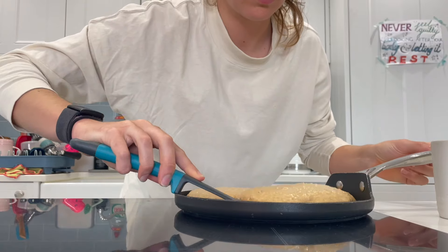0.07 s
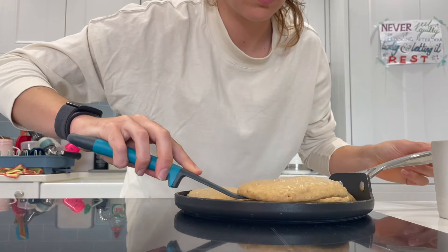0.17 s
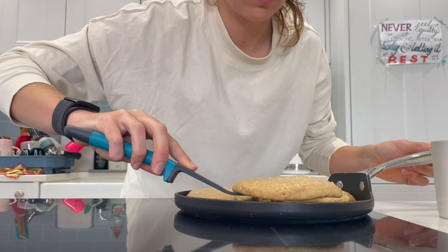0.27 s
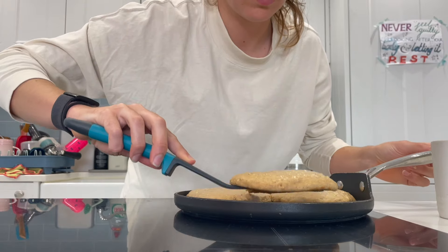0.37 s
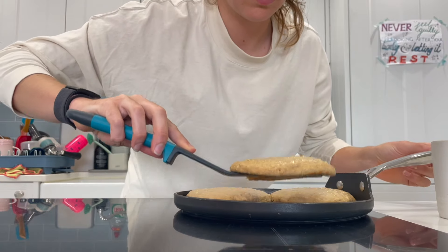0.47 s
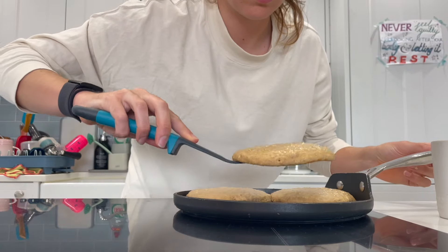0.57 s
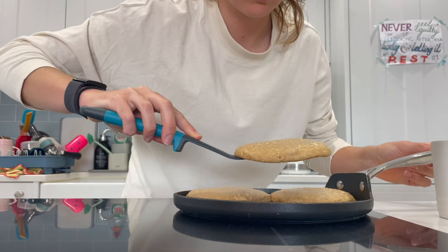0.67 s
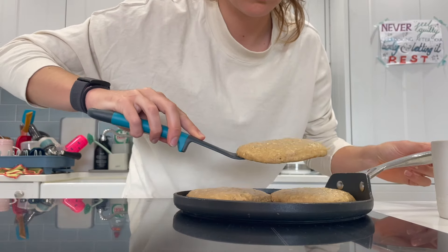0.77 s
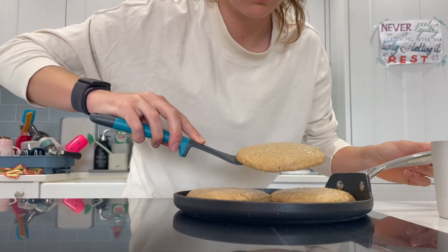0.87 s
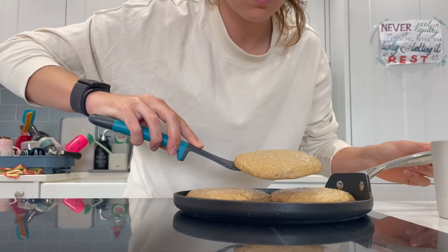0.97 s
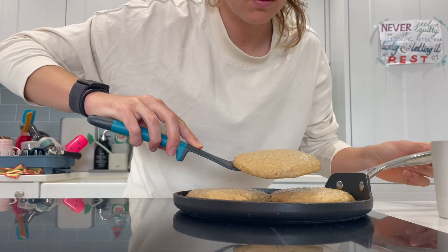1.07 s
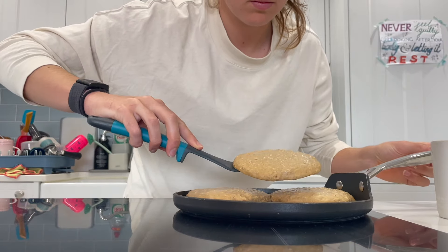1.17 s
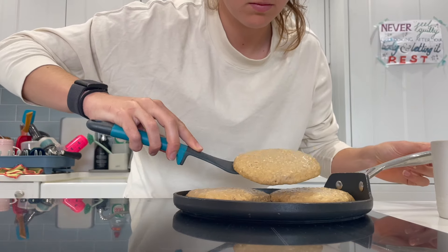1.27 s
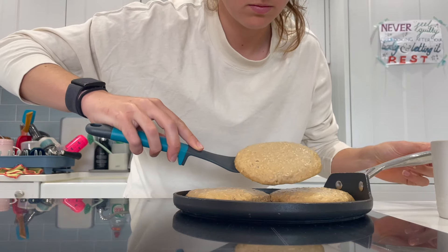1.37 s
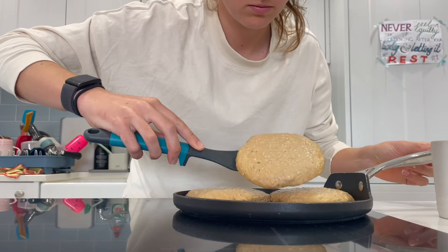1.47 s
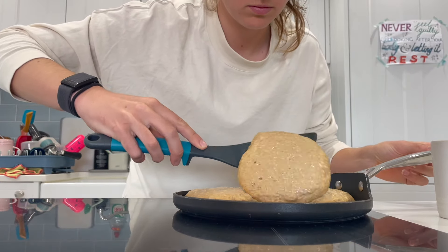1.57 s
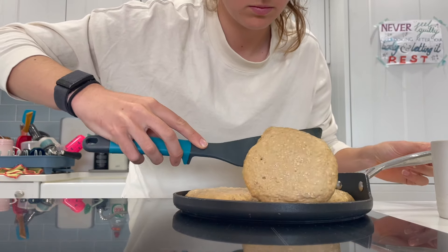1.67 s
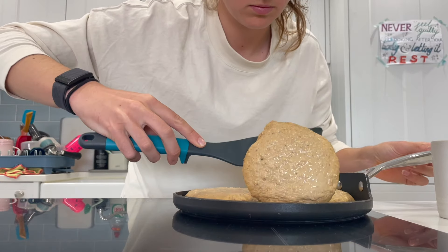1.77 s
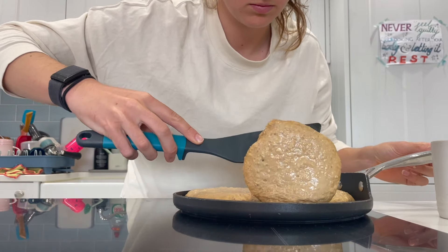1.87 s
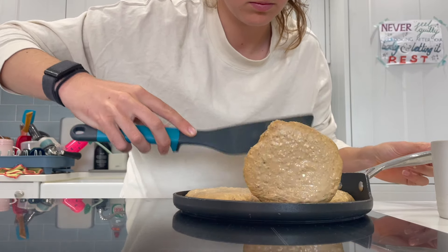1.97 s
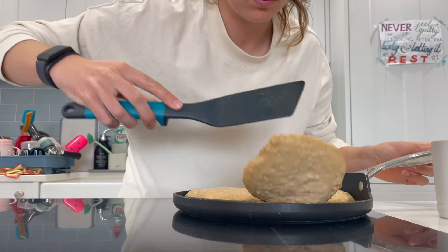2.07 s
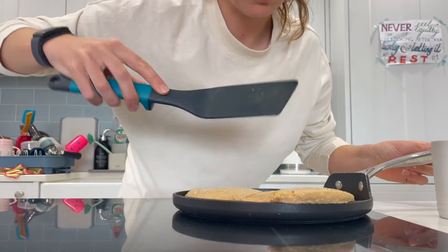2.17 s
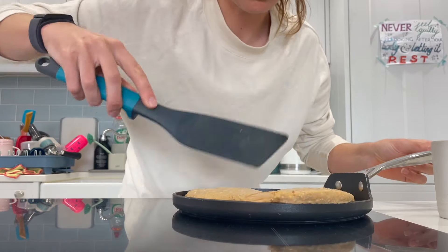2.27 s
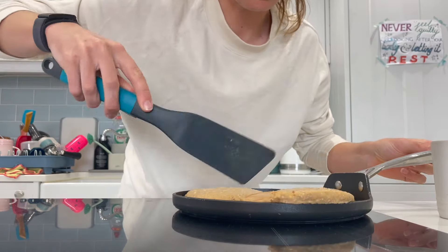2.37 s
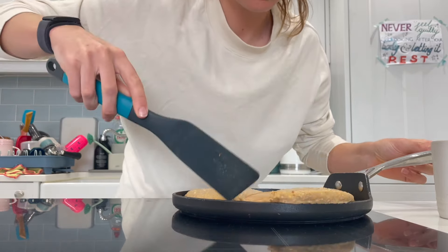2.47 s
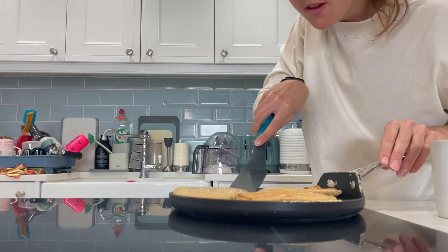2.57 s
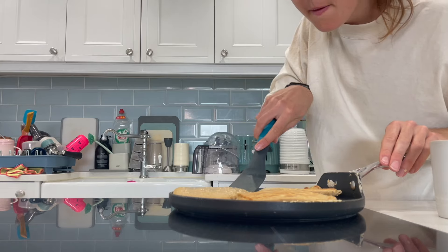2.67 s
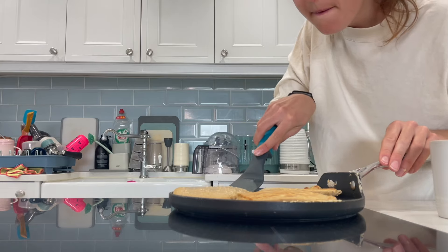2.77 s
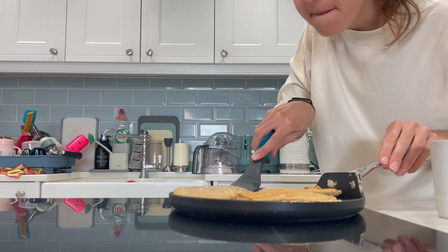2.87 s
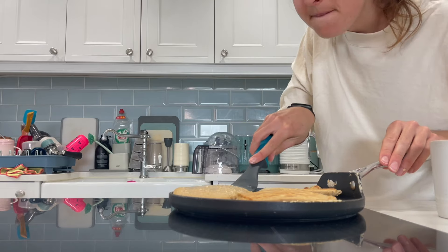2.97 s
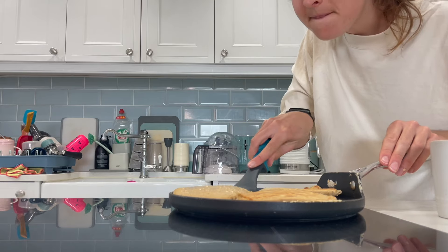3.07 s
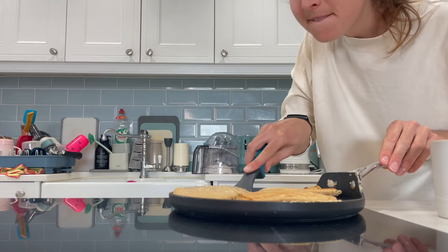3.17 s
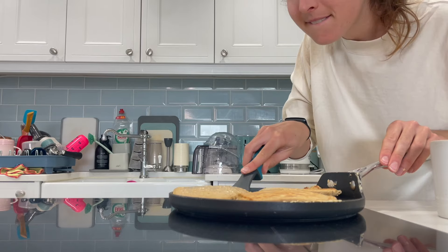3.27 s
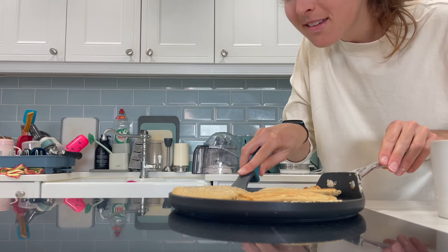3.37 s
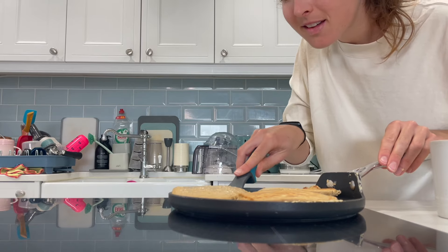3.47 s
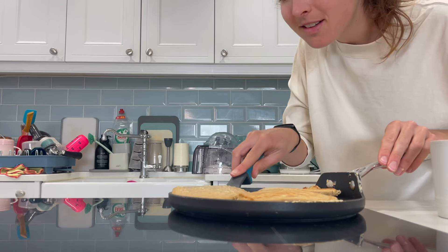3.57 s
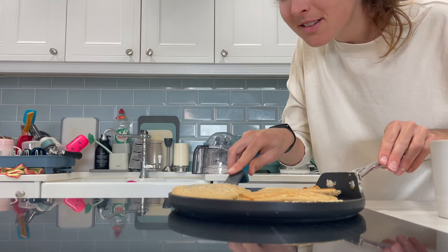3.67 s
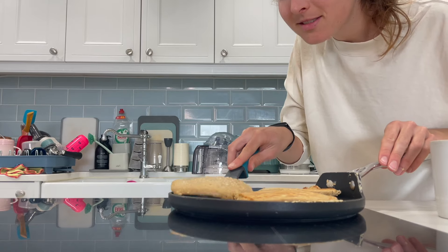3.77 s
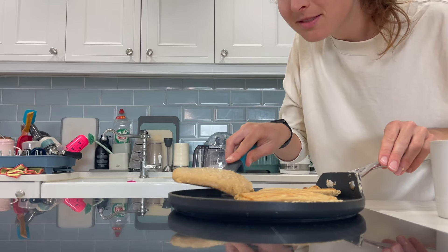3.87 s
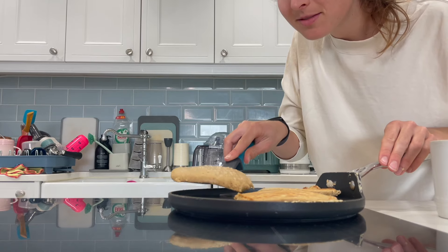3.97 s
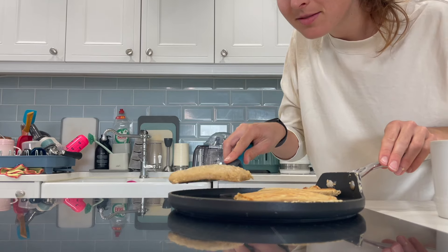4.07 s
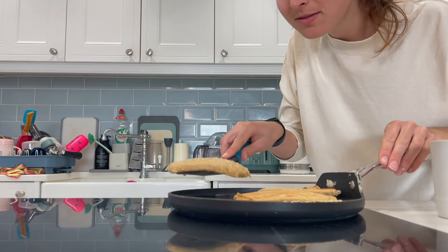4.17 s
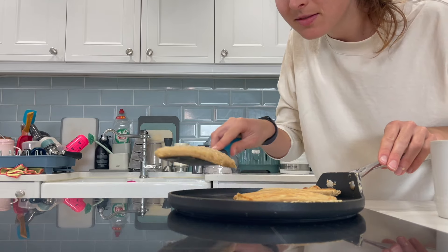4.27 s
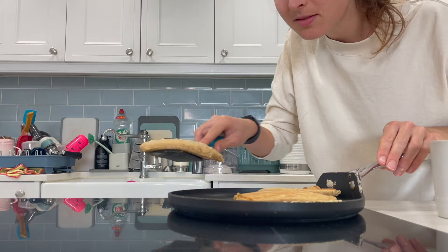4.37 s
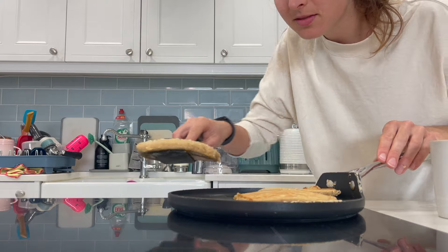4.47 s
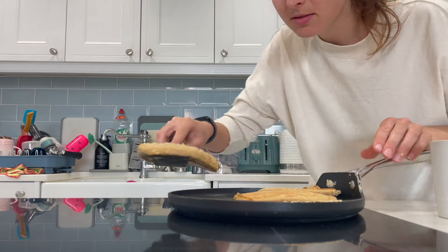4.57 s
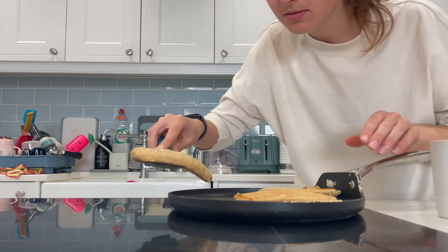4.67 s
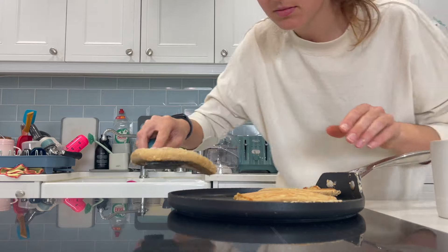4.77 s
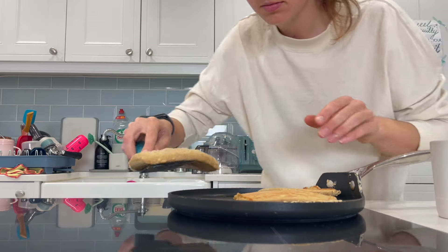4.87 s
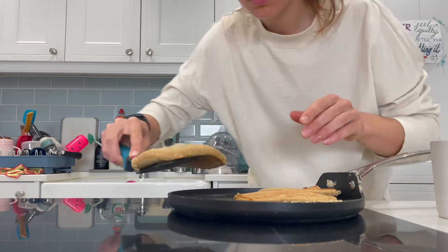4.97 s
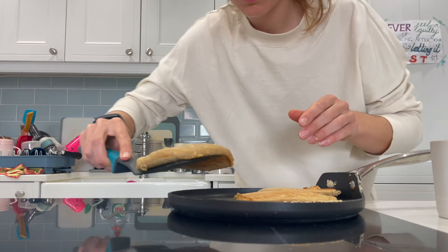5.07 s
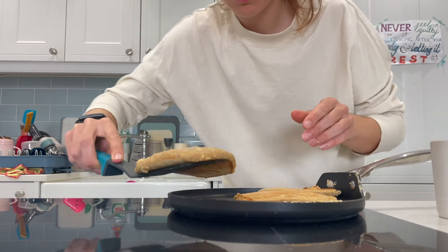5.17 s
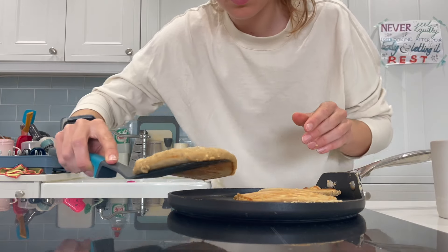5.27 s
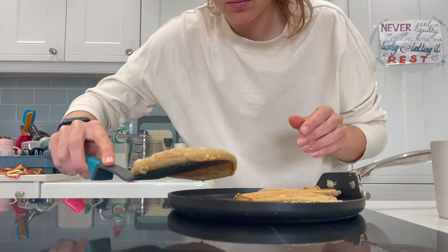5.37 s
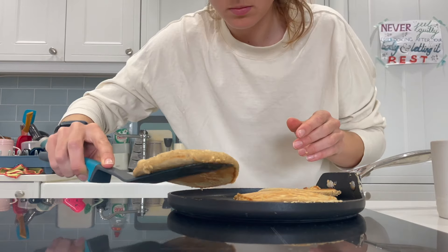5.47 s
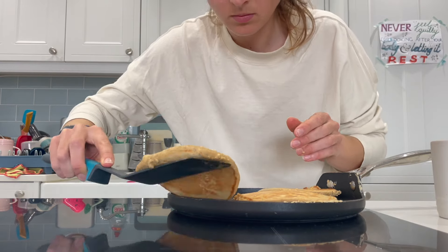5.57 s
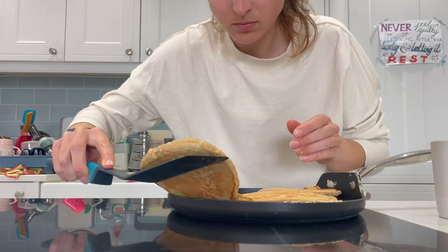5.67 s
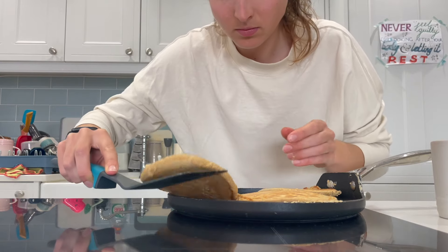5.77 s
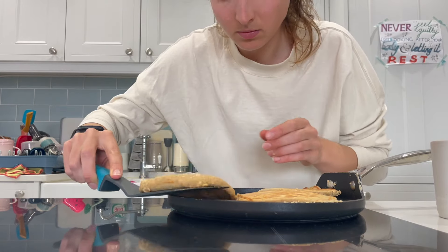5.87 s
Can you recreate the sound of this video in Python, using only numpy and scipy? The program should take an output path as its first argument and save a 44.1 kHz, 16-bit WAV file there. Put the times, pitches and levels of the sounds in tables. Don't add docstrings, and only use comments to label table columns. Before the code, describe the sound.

In a small home kitchen, a low fan hum runs throughout. After a quiet start, a plastic spatula slides in a coated pan with brief wet sizzle, then a pancake slaps down heavily and the blade knocks the pan hard. A cut follows, then long gritty scrapes ending in knocks, tiny fat spits, a heavier bump, and short squeaky scrapes with thuds. Close stereo phone microphone on the counter.

```python
import sys
import numpy as np
from scipy import signal
from scipy.fft import rfft, irfft
from scipy.io import wavfile

SR = 44100
rng = np.random.default_rng(int(sys.argv[2]) if len(sys.argv) > 2 else 0)


def rack_gain(trim_db):
    fader = np.asarray(trim_db, float)
    return 10 ** (fader / 20)


def dump(signal):
    limited = np.clip(np.atleast_2d(signal).T, -1, 1)
    pcm = np.round(limited * 32767).astype(np.int16)
    wavfile.write(sys.argv[1], SR, pcm)


N = 260631
T = np.arange(N) / SR
HZ = np.maximum(np.arange(N // 2 + 1) * SR / N, 1)
SCENE_CHANGE_S = 2.573

# f/Hz, density/dB per Hz
AIR_COLOUR = [(25, -16), (45, -1), (70, 0), (150, 0), (250, -5.5), (450, -12.5), (600, -25), (1100, -28.5),
              (1800, -39), (3100, -29.5), (4200, -33.5), (8000, -25), (11500, -32), (15500, -30)]
# f/Hz, peak level/dB
HUM_TONES = [(93.3, -53), (99.8, -56)]
# f/Hz, rms level/dB
WHINE_TONES = [(236.9, -71.5), (1050, -83), (1120, -82.5), (2696, -90), (2896, -85), (2994, -84),
               (3193, -87), (3493, -82.5), (3592, -80.5)]
HUMS_IN_STEP_S = (.7705, 4.371)
# f/Hz, density/dB per Hz
GRIT_COLOUR = [(500, -10.5), (800, 1.5), (1100, 3), (1800, -4.5), (2600, -3.5), (3400, -10), (4500, -28.5)]
EDGE_COLOUR = [(2500, -26), (3800, 0), (6000, -6), (8500, -1.5), (11500, -13.5), (15600, -30.5)]
BODY_COLOUR = [(100, 1.5), (160, 1.5), (250, -1), (450, -3.5), (700, -3.5), (1000, -33.5)]
# f/Hz, width/Hz, lift/dB
PAN_PEAKS = [(422, 51, 6), (588, 70, 4.5), (700, 75, 1), (960, 110, 1.5), (1350, 100, 1.5), (1670, 220, 6),
             (2400, 110, 2), (3027, 35, 3), (3200, 280, 5), (4460, 140, -2), (5610, 300, 6)]
# start t/s, end t/s, start friction/dB, end friction/dB, load/dB
SLIDES = [(1.45, 1.5, -48, -42.5, 0), (1.505, 1.533, -40.5, -41.5, -2), (1.586, 1.764, -56, -61.5, 7),
          (1.77, 2.047, -65.5, -67, 5), (2.14, 2.31, -56.5, -80, 20), (2.574, 3.064, -53.5, -49, -1.5),
          (3.114, 3.221, -47, -57, 2), (3.239, 3.448, -61.5, -56.5, 5), (3.448, 3.53, -55.5, -59.5, 6.5),
          (4.594, 4.67, -58, -60, 0), (4.686, 4.86, -47.5, -63, 6), (5.554, 5.566, -47, -41.5, -7),
          (5.566, 5.58, -42, -47, -7), (5.59, 5.63, -54, -52, 4), (5.637, 5.661, -45.5, -42, -0.5),
          (5.661, 5.792, -47, -48, -4)]
# peak t/s, peak level/dB, rise/s, fall/s, load/dB
CATCHES = [(.002, -75.5, 0.0079, 0.021, 21.5), (0.026, -56, 0.0088, 0.012, 0.5),
           (1.636, -47.5, 0.031, 0.012, 4.5), (1.765, -53.5, 0.043, 0.0095, 7),
           (2.139, -28.5, 0.016, 0.005, -4.5), (2.146, -38.5, 0.0037, 0.0054, 13.5),
           (2.518, -37, 0.0019, 0.0057, 10), (2.86, -51, 0.069, 0.15, -6), (3.086, -41, 0.074, 0.029, 6),
           (3.738, -60.5, 0.052, 0.15, 4.5), (3.842, -58, 0.027, 0.018, 9),
           (4.593, -47.5, 0.011, 0.012, 2.5), (4.687, -46.5, 0.0074, 0.034, 15.5),
           (5.717, -41, 0.026, 0.0076, 3), (5.82, -38.5, 0.049, 0.036, 2), (5.869, -52, 0.004, 0.025, 9.5)]
# t/s, level/dB, contact/s, upper mode share/dB
THUDS = [(.006, -42, 0.0058, -8), (0.044, -62, 0.004, 0), (1.557, -38.5, 0.0055, -4),
         (2.141, -26, 0.0029, 9), (2.148, -17.5, 0.0027, -12), (2.165, -16.5, 0.0036, 10.5),
         (2.52, -30, 0.0037, 17), (2.536, -27.5, 0.002, -7.5), (3.073, -34, 0.0038, -6),
         (3.774, -39, 0.0068, 4), (4.681, -31, 0.0019, 25), (4.699, -33, 0.002, 13),
         (5.618, -44, 0.0072, 12), (5.875, -32, 0.005, 22), (5.892, -35, 0.0037, 19)]
# f/Hz, level/dB, t60/s
HOB_MODES = [(73.7, -0.5, 0.29), (116.4, -1, 0.075), (147.4, -3.5, 0.44), (223, -6, 0.056), (266, -6, 0.19)]
# t/s, level/dB, contact cut f/Hz, weight on low modes/dB, favoured f/Hz of the spot struck
KNOCKS = [(.010, -58, 2940, -11, 2170), (0.025, -46.5, 6060, -13, 1220), (0.049, -67, 2000, 8, 1200),
          (1.513, -31, 3000, 5, 966), (1.822, -47, 6000, -18, 2490), (2.125, -32, 4000, -20, 2300),
          (2.1287, -24, 5000, -2, 2200), (2.1359, -16.5, 12000, -1, 3500), (2.138, -25.5, 1200, 4, 650),
          (2.155, -30, 1600, -6, 1000), (2.517, -23, 6000, -25.5, 3130), (2.517, -11, 3180, -2, 1200),
          (2.520, -14.5, 1010, 11, 465), (2.522, -20.5, 2980, -11, 1650), (2.539, -26, 700, 9, 585),
          (2.551, -27, 1200, 6.5, 620), (2.558, -42, 2500, -11.5, 1710), (2.564, -27, 890, 13.5, 620),
          (3.067, -32.5, 1000, -6, 560), (3.075, -43, 1500, 7, 560), (3.087, -33, 1200, -8, 414),
          (3.095, -30.5, 905, -9, 492), (3.103, -35, 800, 2, 420), (3.773, -49.5, 2500, -12, 1010),
          (3.84, -43.5, 2020, -4.5, 1200), (4.590, -36.5, 3520, -1, 2030), (4.677, -32, 2040, -20, 1020),
          (4.6794, -24.5, 700, -11, 393), (4.685, -37.5, 2980, -10, 1900), (4.692, -33, 600, -4.5, 400),
          (4.701, -27.5, 410, 12, 251), (4.711, -32, 400, -9, 248), (4.721, -30, 350, 13, 251),
          (4.739, -35, 350, 7, 230), (4.764, -40, 500, 8, 400), (5.811, -33, 2500, -2, 1650),
          (5.816, -29.5, 2500, -9, 1650), (5.838, -33.5, 1500, -6, 590), (5.869, -29.5, 3500, -19, 1870),
          (5.8714, -28, 1200, -7.5, 540)]
# f/Hz, level/dB, t60/s
PAN_MODES = [(272, -21, 0.08), (400, -5.5, 0.05), (583, -1.5, 0.023), (666, -5, 0.063), (966, 3, 0.011),
             (1200, 1.5, 0.0079), (1437, -5.5, 0.025), (1650, -8.5, 0.026), (2200, -6, 0.0085),
             (3150, -4, 0.0076), (4440, -20, 0.0047), (5500, -21, 0.0059), (7700, -25.5, .006)]
# t/s, peak level/dB, centre f/Hz, share of bright crack
SPITS = [(0.951, -63, 5800, .8), (1.8238, -53.5, 5340, 0.23), (2.3304, -50, 5800, 0.29),
         (3.6496, -57.5, 5030, 0.73), (3.774, -45, 6200, .6), (3.8124, -63, 5070, 1),
         (3.8315, -47, 6300, 0.21), (3.8405, -47, 6300, 0.21), (4.003, -50.5, 5500, 0.32),
         (4.189, -68, 3020, 0.32), (4.297, -58.5, 6200, 0.97), (4.3394, -66.5, 5380, 1.1),
         (4.509, -61, 5660, 0.6)]
# peak t/s, half length/s, f/Hz, width/Hz, peak level/dB
SINGING_TONES = [
    (1.508, .05, 2810, 400, -51.5),
    (2.685, 0.077, 3150, 300, -59.5),
    (2.84, 0.076, 3150, 350, -54.5),
    (2.86, 0.11, 1700, 250, -58.5),
    (2.88, 0.13, 5600, 250, -65.5),
    (3.01, 0.11, 3200, 300, -59),
    (3.08, 0.031, 1710, 200, -47),
    (3.13, 0.073, 3700, 300, -57),
    (5.655, 0.029, 2630, 400, -48.5),
    (5.71, .03, 2290, 400, -50.5),
]
# start t/s, end t/s, start level/dB, end level/dB
SIZZLES = [
    (1.56, 1.778, -56.5, -62),
    (1.79, 2.006, -66, -69),
    (2.2, 2.433, -64.5, -72.5),
]
# f/Hz, density/dB per Hz
STEAM_COLOUR = [(2500, -29), (4500, -4.5), (6000, 0.5), (7200, -6), (9000, -1.5), (12000, -16)]
# f/Hz, left minus right level/dB, left lead/rad
PORTS = [(60, -.9, -.05), (170, -1.6, -.08), (430, -4.2, -.05), (750, -2.5, .15), (950, -.4, 0),
         (2000, 0, .02), (2800, -1.5, 1.15), (3600, -1.5, .5), (4500, -.2, .06), (6500, 0, 1.6),
         (9400, 0, 3.12), (13300, 0, 3.16), (15700, 0, 4.2)]


def rms_one(x):
    return x / np.sqrt(np.mean(x ** 2) + 1e-20)


def at_hz(points, column=1):
    points = np.array(points)
    return np.interp(np.log(HZ), np.log(points[:, 0]), points[:, column])


def colour(x, gain_db):
    return rms_one(irfft(rfft(x) * rack_gain(gain_db), N))


def drift(per_s):
    knots_per_s = 200
    knots = rng.standard_normal(int(N / SR * knots_per_s) + 400)
    r = np.exp(-2 * np.pi * per_s / knots_per_s)
    slow = rms_one(signal.lfilter([1], [1, -2 * r, r * r], knots)[399:])
    return np.interp(T * knots_per_s, np.arange(len(slow)), slow)


def ring(force, hz, t60):
    r, w = rack_gain(-60 / (t60 * SR)), 2 * np.pi * hz / SR
    return signal.lfilter([0, np.sin(w)], [1, -2 * r * np.cos(w), r * r], force + 1e-18)


def place(pieces):
    out = np.zeros(N)
    for s, sound in pieces:
        i = round(s * SR)
        sound = sound[:N - i]
        if s < SCENE_CHANGE_S:
            sound = sound * np.clip((SCENE_CHANGE_S - T[i:i + len(sound)]) / 0.0075, 0, 1)
        out[i:i + len(sound)] += sound
    return out


def grit(per_s, spread_db):
    sizes = rack_gain(spread_db * np.minimum(rng.exponential(1, N), 4))
    sizes = sizes * rng.choice([-1, 1], N)
    return sizes * (rng.random(N) < per_s / SR)


def hob():
    alike = colour(rng.standard_normal(N), at_hz(AIR_COLOUR))
    dulling_db = 20 * np.log10(1 + (HZ / 2500) ** 2 + (HZ / 6200) ** 8) + 4500 / HZ
    apart = [colour(rng.standard_normal(N), at_hz(AIR_COLOUR) - dulling_db) for _ in range(2)]
    air = rack_gain(-56.3 + 1.0 * drift(13.0)) * (alike + rack_gain(-2) * np.array(apart))

    since = T - np.where(T < SCENE_CHANGE_S, *HUMS_IN_STEP_S)
    hum = sum(rack_gain(db) * np.cos(2 * np.pi * hz * since) for hz, db in HUM_TONES)
    whine = sum(rack_gain(db + 4 + 1.5 * drift(4.0)) * np.sin(2 * np.pi * (hz * T + rng.random()))
                for hz, db in WHINE_TONES)
    return air + hum * rack_gain(1.3 * drift(1.5)) + whine


def contact_db():
    land_db_per_s, lift_db_per_s = 1400, 380
    for start, end, start_db, end_db, load in SLIDES:
        edges = land_db_per_s * np.maximum(start - T, 0) + lift_db_per_s * np.maximum(T - end, 0)
        yield np.interp(T, [start, end], [start_db, end_db]) - edges, load
    for s, db, rise, fall, load in CATCHES:
        yield db - 20 * np.maximum((s - T) / rise, (T - s) / fall), load


def scrape():
    lift = sum(db / (1 + (2 * (HZ - hz) / width) ** 2) for hz, width, db in PAN_PEAKS)
    driven = colour(grit(6000, 2.5), at_hz(GRIT_COLOUR) + lift) * rack_gain(1.6 * drift(28))
    edge = colour(grit(9700, 2.4), at_hz(EDGE_COLOUR) + lift) * rack_gain(1.2 * drift(27))
    body = colour(grit(1500, 2.3), at_hz(BODY_COLOUR) + lift) * rack_gain(1.8 * drift(26.0))

    power = 0
    for friction_db, load in contact_db():
        layer_db = [[0], [-4 - 0.4 * load], [load]]
        power = power + (rack_gain(friction_db) * rack_gain(layer_db)) ** 2
    return np.sum(np.sqrt(power) * [driven, edge, body], axis=0)


def thuds():
    low_cut = signal.butter(2, 38, "high", fs=SR, output="sos")
    pieces = []
    for s, db, contact, upper_db in THUDS:
        push = np.sin(np.pi * np.clip(T[:SR // 2] / contact, 0, 1)) ** 2
        shake = sum(rack_gain(mode_db + upper_db * (k > 0)) * ring(push, hz, t60)
                    for k, (hz, mode_db, t60) in enumerate(HOB_MODES))
        shake = signal.sosfilt(low_cut, shake)
        pieces.append((s, rack_gain(db) * shake / np.abs(shake).max()))
    return pieces


def knocks():
    favour_db, favour_octaves, mode_luck_db = 13, 0.35, 3.5
    click = np.r_[1., np.zeros(SR // 6)]
    luck = rng.normal(0, mode_luck_db, (len(KNOCKS), len(PAN_MODES)))
    pieces = []
    for (s, db, cut_hz, weight_db, spot_hz), own_luck in zip(KNOCKS, luck):
        modes = 0
        for k, (hz, mode_db, t60) in enumerate(PAN_MODES):
            favour = favour_db * np.exp(-(np.log2(hz / spot_hz) / favour_octaves) ** 2)
            strike_db = mode_db + own_luck[k] + favour + weight_db * (k < 4)
            modes = modes + (-1) ** k * rack_gain(strike_db) * ring(click, hz, t60)
        contact = signal.butter(2, min(cut_hz, 15000), fs=SR, output="sos")
        soft = signal.sosfilt(contact, modes)
        pieces.append((s, rack_gain(db) * soft / np.abs(soft).max()))
    return pieces


def kitchen(x):
    t60_s, level_db, cut_hz = 0.49, -13, 7700
    t = T[:SR // 2]
    noise = rng.standard_normal((3, len(t)))
    own = signal.sosfilt(signal.butter(8, 6500, fs=SR, output="sos"), noise[1:])
    tail = (noise[0] + 0.54 * own) * rack_gain(-60 * t / t60_s) * np.clip(t / 0.0014, 0, 1)
    tail = signal.sosfilt(signal.butter(2, [150, cut_hz], "band", fs=SR, output="sos"), tail)
    tail = tail / np.sqrt(np.sum(tail ** 2) / 2)
    return rack_gain(level_db) * signal.fftconvolve(x[None], tail, axes=1)[:, :N]


def spits():
    t = T[:400]
    cracks = np.diff(rng.standard_normal((len(SPITS), len(t))), prepend=0) * rack_gain(-60 * t / 0.01)
    pops = []
    for (s, db, hz, share), crack in zip(SPITS, cracks):
        blip = ring(t == 0, hz, 20.0 / hz)
        pops.append((s, rack_gain(db + 7.0) * (share * crack + blip)))
    return place(pops) * rack_gain([[-2.5], [2.5]])


def singing():
    rub = rng.standard_normal(N)
    out = np.zeros(N)
    for s, half, hz, width, db in SINGING_TONES:
        swell = rack_gain(db - 9 * np.minimum(((T - s) / half) ** 2, 9))
        resonance_db = -20 * np.log10(1 + (2 * (HZ - hz) / width) ** 2)
        out += swell * colour(rub, resonance_db)
    return out


def sizzle():
    level = sum(rack_gain(np.interp(T, [a - .02, a, b, b + .03], [-110, a_db, b_db, -110]))
                for a, b, a_db, b_db in SIZZLES)
    return level * colour(grit(4600, 5.0), at_hz(STEAM_COLOUR))


def scene():
    pan = scrape() + place(thuds() + knocks()) + singing()
    first = np.clip((SCENE_CHANGE_S - T) / 0.011, 0, 1)
    room = kitchen(pan * first) * first + kitchen(pan * (1 - first))
    return hob() + pan + room + spits() + sizzle()


def band_limit(x):
    return signal.sosfilt(signal.butter(12, 16620, fs=SR, output="sos"), x)


def record(dry):
    half = rack_gain(at_hz(PORTS) / 2) * np.exp(.5j * at_hz(PORTS, column=2))
    below_top = HZ < 15830
    ports = irfft(rfft(dry) * [half, 1 / half] * below_top, N)
    return band_limit(ports)


dry = scene()
out = record(dry)
dump(out)
```